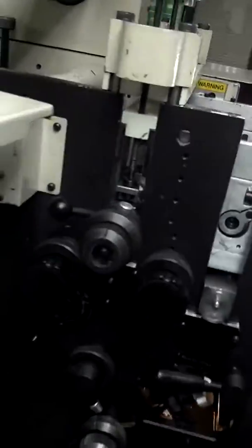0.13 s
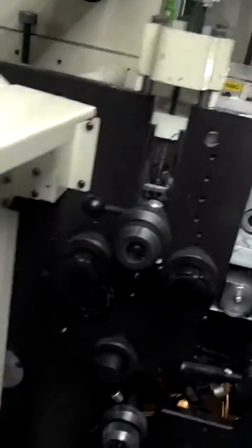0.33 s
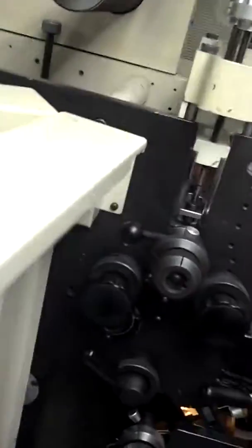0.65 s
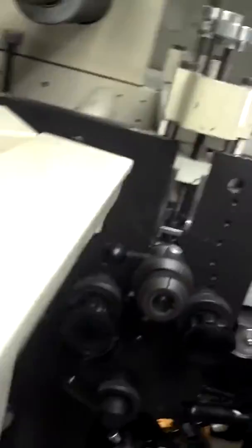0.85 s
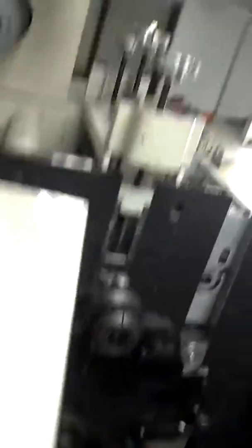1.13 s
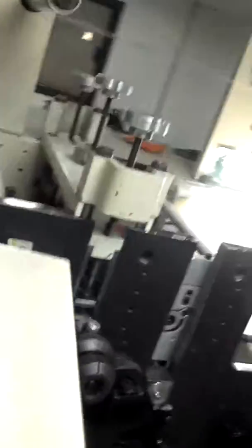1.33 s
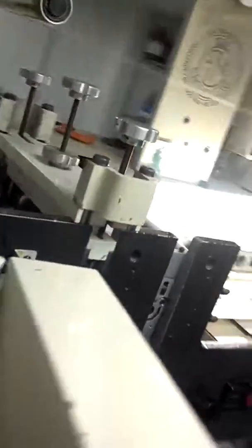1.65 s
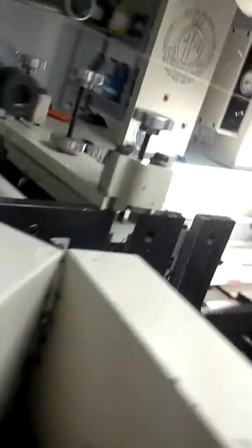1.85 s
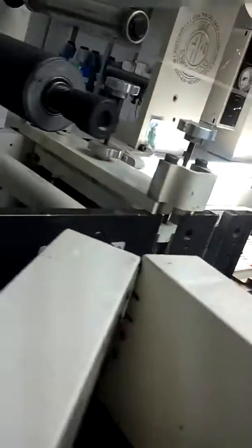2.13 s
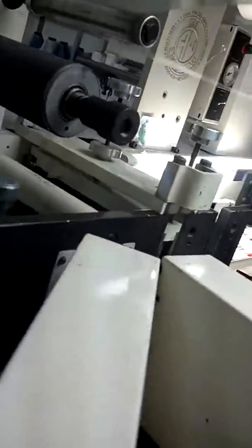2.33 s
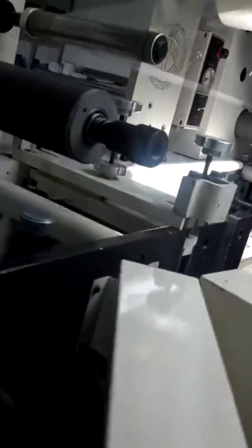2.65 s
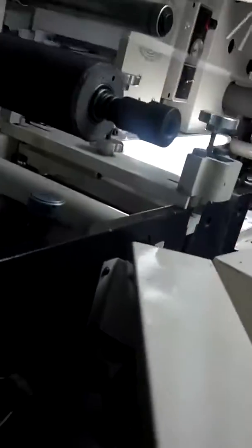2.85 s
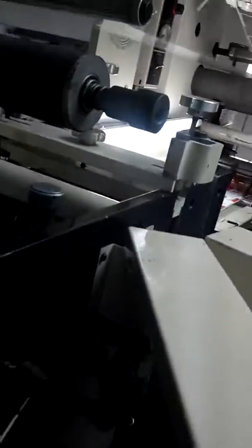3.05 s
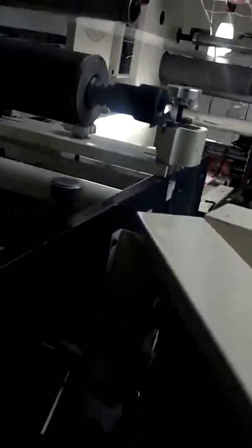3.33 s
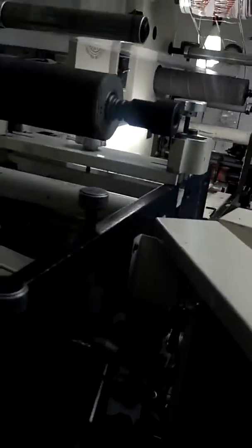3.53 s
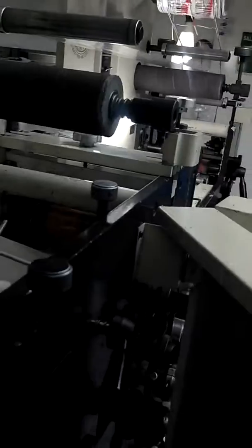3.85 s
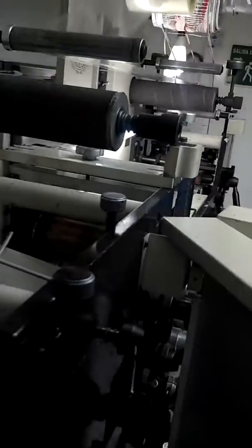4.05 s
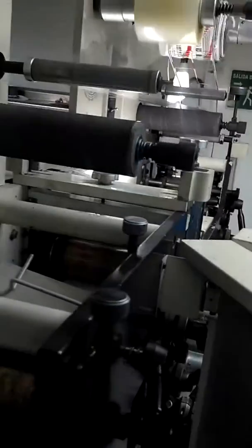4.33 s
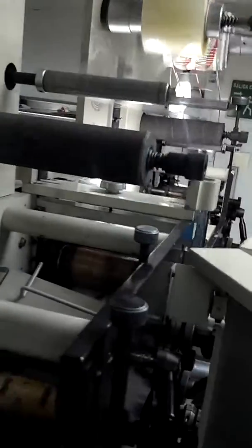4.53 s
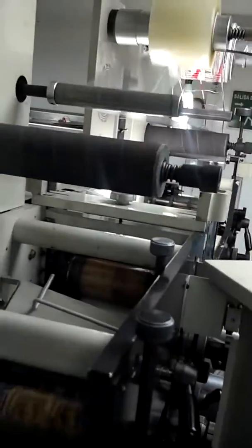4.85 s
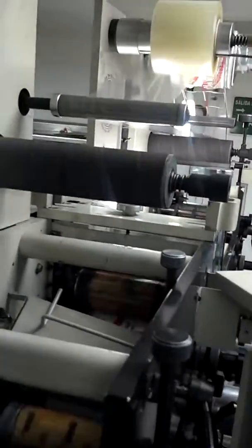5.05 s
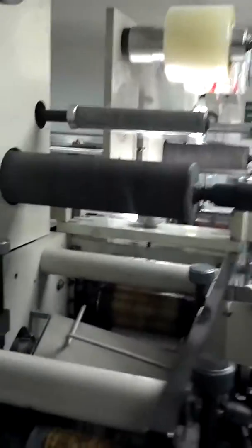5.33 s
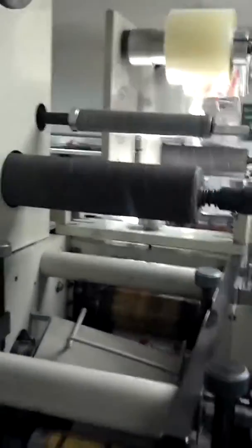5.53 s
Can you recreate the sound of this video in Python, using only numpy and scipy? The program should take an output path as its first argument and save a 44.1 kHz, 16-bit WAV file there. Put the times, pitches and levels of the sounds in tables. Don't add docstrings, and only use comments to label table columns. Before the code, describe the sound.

Close, moving pickup of a running label press: throbbing motor hum, gear whine, rumbling rollers, fluttering air hiss, sharp little ticks and hollow knocks.

```python
import sys
import numpy as np
from scipy import signal
from scipy.fft import rfft, irfft, next_fast_len
from scipy.io import wavfile
from scipy.ndimage import uniform_filter1d, map_coordinates

SR = 44100
rng = np.random.default_rng(int(sys.argv[2]) if len(sys.argv) > 2 else 0)


def gain_from_db(level_db):
    decades = np.asarray(level_db, float) / 20
    return 10 ** decades


def put_to_file(sound):
    columns = np.atleast_2d(sound).T
    safe = np.clip(columns, -1, 1)
    whole_steps = np.round(safe * 32767)
    wavfile.write(sys.argv[1], SR, whole_steps.astype(np.int16))


N = 251370
T = np.arange(N) / SR
SHAFT_HZ = 13.967
HIGH_TOOTH_TURN = 0.96


def unit(x):
    return x / np.sqrt(np.mean(x ** 2) + 1e-20)


def along(points, hz):
    f, v = np.transpose(points)
    return np.interp(np.log(hz + 1), np.log(f + 1), v)


def curves(rows):
    s, *cols = np.transpose(rows)
    return [np.interp(T, s, c) for c in cols]


def wobble(rate_hz):
    fine = np.arange(0, N / SR * rate_hz + 1, 1 / 8)
    knots = rng.standard_normal(int(N * rate_hz / SR) + 4)
    return np.interp(T * rate_hz, fine, map_coordinates(knots, [fine]))


def tooth_beat():
    return np.cos(2 * 2 * np.pi * (SHAFT_HZ * T - HIGH_TOOTH_TURN))


# frequency in Hz, ratio in dB.
APART = [(40, -24.5), (100, -16.5), (250, -13), (600, -5.5), (900, -6.5), (1100, 2), (1300, -38),
         (1500, -17), (1650, 8), (2300, -2), (3000, -3), (5000, -1), (15000, 1)]


def coloured(pair, spectrum):
    m = next_fast_len(N + 8192)
    hz = np.fft.rfftfreq(m, 1 / SR)
    gain = gain_from_db(along(spectrum, hz)) * [np.ones_like(hz), gain_from_db(along(APART, hz))]
    return irfft(rfft(pair, m) * gain, m)[:, :N]


def rush(spectrum, patchy_db, speckle_db):
    z = signal.stft(rng.standard_normal((2, N)), nperseg=512)[2]

    def field(size):
        grain = rng.standard_normal(z.shape[1:])
        return unit(uniform_filter1d(uniform_filter1d(grain, size, 0), size, 1))

    gain = gain_from_db(patchy_db * field(10) + speckle_db * field(3))
    pair = coloured(signal.istft(z * gain, nperseg=512)[1][:, :N], spectrum)
    return pair / np.std(pair[0])


def tone(hz, db, sway_db, lead=None):
    if lead is None:
        lead = 2 * np.pi * rng.random()
    turn = 2 * np.pi * hz * T + lead
    across = gain_from_db(along(APART, hz) - 12.0 + sway_db * wobble(1.63))
    level = np.sqrt(2) * gain_from_db(db + sway_db * wobble(1.636))
    return level * np.array([np.sin(turn), across * np.sin(turn + 0.315 * wobble(0.826))])


def bursts(rows, t60_s):
    t = np.arange(1024) / SR
    out = np.zeros((2, N + len(t)))
    noise = rng.standard_normal((len(rows), 2, len(t)))
    shape = gain_from_db(-60 * t / t60_s) * (1 - np.exp(-t / 0.00047))
    for (s, db), puff in zip(rows, noise):
        out[:, round(s * SR):][:, :len(t)] += gain_from_db(db) * shape * puff / np.linalg.norm(shape * puff[0])
    return out[:, :N]


# frequency in Hz, density in dB per Hz.
RUMBLE = [(25, -28.5), (40, -7), (70, -10.5), (100, 2), (170, -3.5), (250, 2), (400, -1), (680, -6),
          (950, -11.5), (1400, -20.5), (2000, -120)]
WHIRR = [(400, -120), (700, -15), (1000, -2.5), (1400, 2), (1800, -2.5), (2300, 2), (3200, 1.5),
         (4100, -4.5), (5000, -2.5), (6500, -10), (9000, -120)]


def rollers(gain_db, rumble_db, whirr_db):
    rumble_level = gain_from_db(rumble_db - 2.5 + 0.8 * wobble(28) + 0.78 * tooth_beat())
    rumble = rumble_level * rush(RUMBLE, patchy_db=0.52, speckle_db=1.5)
    whirr = gain_from_db(whirr_db - 4 + 0.54 * wobble(35)) * rush(WHIRR, patchy_db=0.8541, speckle_db=2.0)
    return gain_from_db(gain_db) * (rumble + whirr)


# frequency in Hz, density in dB per Hz.
HISS = [(3000, -120), (4500, -26.5), (6000, 0.5), (9600, 1), (11500, 2), (14000, -21.5), (18000, -120)]
SIZZLE = [(7000, -120), (9500, -33.5), (12000, -0.5), (15000, 1.5), (20000, 4)]


def air(gain_db, hiss_db):
    label_turn = 2 * np.pi * np.cumsum(46 + 3 * wobble(4.7)) / SR
    puffs = np.clip(np.sin(label_turn), 0, 1) ** 6 * abs(wobble(1.738))
    flutter_db = 2.67 * puffs + 1.093 * wobble(70) + 0.12 * wobble(5.0612)
    hiss = gain_from_db(hiss_db - 4) * rush(HISS, patchy_db=1.5, speckle_db=2.0)
    sizzle = gain_from_db(-4.5) * rush(SIZZLE, patchy_db=0.84, speckle_db=1.5)
    return gain_from_db(gain_db + flutter_db) * (hiss + sizzle)


# start in seconds, peak in dB, low part in dB relative to the peak.
TICKS = [(0.0231, -22, -21), (0.1987, -23.5, -10), (0.4918, -24, -14.5), (0.9085, -21, -11.5),
         (1.0445, -19, -17.5), (1.3021, -24.5, -6), (1.3171, -17, -10), (1.3863, -31, -9),
         (1.436, -32.5, -5), (1.4506, -17.5, -19), (1.5206, -21, -21.5), (2.0606, -17, -9),
         (2.0877, -17, -12), (2.135, -18.5, -14.5), (2.1811, -26.5, -16), (2.3077, -19, -13),
         (2.3514, -23, -23.5), (2.3737, -26.5, -15), (2.4177, -18.5, -24.5), (2.4384, -22, -8.5),
         (2.605, -20, -16.5), (2.693, -19, -7), (2.764, -21.5, -9), (2.7897, -20.5, -8.5),
         (2.827, -25, -13.5), (2.8469, -30, -17.5), (2.909, -21.5, -13.5), (2.9552, -21, -10),
         (2.9986, -22.5, -12), (3.0175, -22, -8.5), (3.2695, -24, -1), (3.3453, -20.5, -10.5),
         (3.3662, -20.5, -7.5), (3.3865, -23, -5.5), (3.482, -29, -14), (3.5272, -25.5, -11),
         (3.5742, -19.5, -14.5), (3.6203, -22, -14), (4.2112, -21.5, -2.5), (4.3332, -19, -8),
         (4.4144, -16, -11.5), (4.4443, -19.5, -16.5), (4.5014, -22.5, -18.5), (4.5281, -32, -13.5),
         (4.5486, -22, -13.5), (4.813, -20.5, -18.5), (4.8397, -21.5, -10.5), (4.8585, -20, -15.5),
         (4.9471, -26.5, 3.5), (4.99, -21, -5.5), (5.0302, -21, -1), (5.0732, -18, -11),
         (5.1432, -20.5, -9), (5.4254, -33.5, -12), (5.4846, -21, -3.5), (5.5565, -19.5, -8),
         (5.6378, -29.5, -14), (5.6595, -18.5, -14)]


def web():
    strays, stray_db, spread_db, stray_low_db = 20, -25.5, 1.5, -0.5
    snaps = list(TICKS)
    for k, (late, size) in enumerate(rng.random((strays, 2))):
        snaps.append(((k + late) * N / SR / strays, stray_db + spread_db * (2 * size - 1), stray_low_db))
    bright = bursts([(s, db + 9.5) for s, db, low in snaps], t60_s=0.016)
    dull = bursts([(s, db + low + 20.5) for s, db, low in snaps], t60_s=0.037)
    bright_spectrum = [(2500, -30.5), (5000, -10.0), (9000, 2.5), (20000, 4)]  # (Hz, dB)
    return coloured(bright, bright_spectrum) + coloured(dull, WHIRR)


# start in seconds, peak in dB, ring in Hz.
KNOCKS = [
    (2.216, -15.5, 569),
    (2.228, -10, 562),
    (2.814, -13, 570),
    (3.929, -9.5, 652),
    (4.871, -20.5, 729),
    (4.915, -11, 685),
    (4.945, -7, 669),
    (5.369, -10, 630),
    (5.509, -16, 600),
    (5.579, -14.5, 625),
]


def knocks():
    t = np.arange(2048) / SR
    blows = np.zeros((2, N + 2048))
    for s, db, hz in KNOCKS:
        ring = gain_from_db(db - 8.0 - 60 * t / 0.02295) * (1 - np.exp(-t / 0.0021)) * np.sin(2 * np.pi * hz * t)
        blows[:, round(s * SR):][:, :len(t)] -= ring * [[1], [.3]]
    return blows[:, :N]


# time in seconds, hum level in dB.
HUM = [(0, -50), (.8, -47), (1.02, -48), (1.09, -56.5), (1.2, -42), (1.32, -48.5), (1.42, -43),
       (2.1, -46.5), (2.55, -43), (3.25, -46), (3.7, -41), (3.95, -48), (4.1, -37.5), (4.3, -46.5),
       (4.5, -41), (5.2, -45.5), (5.4, -37.5), (5.7, -45)]
SLIP = [-13, -13.5, -9.5, -11.5]
THROBS = [-.2, .26, .73, 1.185, 1.565, 2.01, 2.47, 2.915, 3.39, 3.86, 4.205, 4.665, 5.115, 5.565, 5.99]


def motor():
    slip = 2 * np.pi * np.interp(T, THROBS, np.arange(len(THROBS)))
    beat = 1 - sum(gain_from_db(db) * np.exp(1j * k * slip) for k, db in enumerate(SLIP, start=1))
    hum = abs(beat) * tone(120.04, curves(HUM)[0] + 11.04, sway_db=1.73, lead=np.angle(beat))
    return hum + tone(240.1, -51, sway_db=2.5)


# time in seconds, small gear, large gear, housing rattle in dB.
GEARS = [(0.0, -47.5, -51.5, -47.5), (0.13, -46.5, -52.5, -40), (0.43, -48.5, -61.5, -52.5),
         (0.71, -53, -53, -50.5), (1.06, -46, -51, -49.5), (1.13, -66.5, -50, -50.5),
         (1.41, -45, -50, -46.5), (1.98, -43, -41.5, -55), (2.11, -70.5, -44, -51.5),
         (2.5, -41.5, -43, -31.5), (2.78, -42, -48, -40), (2.95, -40, -42.5, -29.5),
         (3.71, -36.5, -46.5, -32), (4.24, -37, -48.5, -30.5), (4.4, -43, -56.5, -34.5),
         (4.98, -40.5, -63, -33.5), (5.48, -38, -64.5, -32), (5.7, -40, -58, -28)]
TEETH = [23, 23, 24, 24, 36, 43, 43, 44, 44, 44, 45, 45, 45, 46, 46, 46, 46, 47, 47, 47, 48, 48, 49, 49, 51,
         56, 59, 59, 80, 80, 42, 44, 46, 48]
# peak in dB, its time in seconds, 6 dB down after seconds.
MESH = [(-45.5, 0.25, .5), (-43, 4.196, 0.23), (-47, 2.32, 1.14), (-47.5, 5.83, 1), (-54, 2.06, 1),
        (-51, 1.48, .5), (-43.5, 4.79, 1.17), (-53.5, 0.68, 1.85), (-47, 2.51, 0.17), (-49.5, 5.6, 0.8),
        (-48, 2.81, 1), (-49.5, 4.32, -0.07), (-53, 5.01, -0.84), (-50.5, 0.24, -0.14), (-53, 1.45, 0.49),
        (-46, 3.645, 0.63), (-43, 4.833, 0.21), (-52.5, 2.32, 0.17), (-46.5, 3.66, 0.38), (-56, 4.77, 0.85),
        (-43.5, 4.37, -0.07), (-50, 5.6, 1.37), (-56, 1.06, 0.27), (-54, 5, 0.63), (-51, 4.8, 0.62),
        (-53, 4.68, 0.41), (-54, 4, 1), (-59.5, 5, -0.02), (-53.5, 3.86, 1), (-52, 5.3, 0.04),
        (-48, 4.05, 0.2), (-46, 4.1, 0.2348), (-45.5, 4.5, 0.23), (-50, 3.95, 0.36)]
# multiple of the shaft rate, level in dB.
ORDERS = [(16, -62.5), (20, -52.5), (21, -52), (28, -59.5), (34, -53.5), (40, -80.5), (64, -64)]
# frequency in Hz, density in dB per Hz.
HOUSING = [(450, -120), (570, -12.5), (610, 8.5), (690, -6.5), (760, 0.5), (1000, -120)]


def gears():
    small_db, large_db, rattle_db = curves(GEARS)

    def locked(k):
        return -2 * np.pi * k * HIGH_TOOTH_TURN + 1.15 * (k % 2)

    pinion_db = -45.5 - 12 * np.exp(-((T - 2.7) / .8) ** 2)
    small = tone(22 * SHAFT_HZ, small_db + 5, sway_db=0.5)
    pinion = tone(18 * SHAFT_HZ, pinion_db, sway_db=1.5)
    large = tone(42 * SHAFT_HZ, large_db + 1, sway_db=0.8, lead=locked(42))
    sidebands = 0
    for k, (db, s, wide_s) in zip(TEETH, MESH):
        near_db = db - 6 * ((T - s) / wide_s) ** 2
        sidebands = sidebands + tone(k * SHAFT_HZ, near_db, sway_db=0.22, lead=locked(k))
    rattle_level = gain_from_db(rattle_db + 0.5 * tooth_beat() - 15.5)
    rattle = rattle_level * rush(HOUSING, patchy_db=2.5, speckle_db=2.5)
    rise_db = 0.46 * T
    weak = sum(tone(k * SHAFT_HZ, db - 6.0 + rise_db, sway_db=4.5) for k, db in ORDERS)
    sideways_db = 3 * np.exp(-(T / 2) ** 2)
    return (small + pinion + large + sidebands + rattle + weak) * gain_from_db([0 * T, sideways_db])


# time in seconds, noise loudness in dB, facing the air jets in dB.
NOISE = [(0, -33.5, -2.5), (.38, -33.5, -1), (.79, -36, -3), (1.2, -31, -1), (1.5, -32, -1.5),
         (1.9, -32, -0.5), (2.3, -34, -3), (2.55, -32, -0.5), (2.9, -34.5, -4), (3.1, -34, -0.5),
         (3.5, -32, -2), (3.9, -32, 0), (4.3, -32, -1.5), (4.75, -33, -0.5), (5.0, -34, -6),
         (5.2, -33.5, 1), (5.46, -32, -0.5), (5.7, -35.5, 0)]


def scene():
    loud_db, facing_db = curves(NOISE)
    rumble_db = -3 + 0.6985 * T - 0.854 * facing_db
    whirr_db = -4 + 0.6354 * T
    noise = rollers(loud_db, rumble_db, whirr_db) + air(loud_db, -5 + facing_db)
    mid, side = noise + web() + knocks() + motor() + gears()
    return np.array([mid + side, mid - side])


# snap time in seconds, rise in dB, creep in seconds.
DUCKS = [
    (0.261, 4, 0.084),
    (.93, 0.5, 0.056),
    (1.083, 3, 0.61),
    (1.42, 1.5, 0.115),
    (2.237, 2, 0.202),
    (2.698, 3.5, 0.045),
    (2.86, 1.5, 0.26),
    (4.245, 3.5, 0.243),
    (4.955, 2, 0.146),
]


def riding():
    snap_s, overshoot, recover_s = 0.00834, 0.67, 0.155
    gain_db = 0
    for s, db, creep_s in DUCKS:
        fall = (1 + np.tanh((T - s) / snap_s)) / 2
        creep = (1 - fall) * np.exp(-abs(T - s) / creep_s)
        dip = overshoot * fall * np.exp(-abs(T - s) / recover_s)
        gain_db = gain_db + db * (creep - dip)
    return gain_db


# frequency in Hz, band level over step in dB.
STEPS = [(200, 36), (800, 18), (1600, 4.5), (3000, -.5), (5200, -1), (7600, -1), (10000, 0), (13000, 2),
         (16000, 0)]
# time in seconds, lowest frequency in Hz.
REFILLS = [
    (.275, 4000),
    (2.1, 10000),
    (2.31, 9000),
    (2.37, 4000),
    (2.605, 3500),
    (2.7, 7000),
    (2.91, 4000),
    (4.82, 7500),
    (5.08, 4000),
]
# centre in seconds, half-length in seconds, centre in Hz, extra dB.
HUNGRY = [(.08, .13, 2500, 5), (.4, .16, 2600, 4), (.92, .16, 2700, 4), (1.5, .13, 2700, 5),
          (1.28, .09, 2700, 2), (2.1, .03, 2400, 7), (2.37, .05, 2600, 4.5), (2.56, .05, 2600, 5),
          (3.03, .07, 2700, 5), (3.7, 2.05, 2700, -1.5), (3.95, .35, 2700, -1.5), (1.8, .16, 2200, -3),
          (2.22, .07, 2700, -2), (.66, .08, 2200, -3), (4.48, .1, 2700, 4), (5.2, .08, 2600, 4),
          (3.2, .45, 8300, 5.5), (.75, .2, 11000, 4), (4.8, .9, 11000, 3), (.15, .2, 8300, 3),
          (.75, .17, 5500, 3), (2.85, 3, 15700, 4), (1.3, .45, 1100, 3)]


def starved(pair):
    block, grid = 1024, 925
    n, k = np.arange(2 * block), np.arange(block) + .5
    window = signal.windows.kaiser_bessel_derived(2 * block, 4 * np.pi)
    basis = np.sqrt(2 / block) * window * np.cos(np.pi / block * np.outer(k, n + .5 + block / 2))
    blocks = N // block + 3
    halves = np.pad([pair[0] + pair[1], pair[0] - pair[1]], ((0, 0), (2 * block - grid, 4 * block)))
    halves = halves[:, :(blocks + 1) * block].reshape(2, -1, block)
    z = np.concatenate([halves[:, :-1], halves[:, 1:]], axis=2) @ basis.T
    hz = k * SR / 2 / block
    t = (np.arange(blocks)[:, None] * block + grid - block) / SR

    def banded(v, size):
        return np.repeat(v.reshape(*v.shape[:-1], -1, size).mean(-1), size, axis=-1)

    power = uniform_filter1d(banded(z ** 2, size=8), size=3, axis=1)
    mood = unit(banded(uniform_filter1d(rng.standard_normal(z.shape), size=3, axis=1), size=16))
    short_db = sum(db * (abs(t - s) < span_s) * (abs(hz - near_hz) < 700) for s, span_s, near_hz, db in HUNGRY)
    mask_db = -8 + short_db + 3.6 * mood
    weak = (power < power[::-1] * gain_from_db(mask_db) ** 2) & (hz > 800)
    step = np.sqrt(banded(power.sum(0), size=32)) * gain_from_db(1.5 * mood[0] - along(STEPS, hz)) + 1e-9
    rounded = np.sign(z) * step * np.floor(abs(z / step) ** .75 + .4054) ** (4 / 3)
    sharp = sum((abs(t - s) < .014) & (hz > above_hz) for s, above_hz in REFILLS) > 0
    spill = gain_from_db(-10) * np.sqrt(power[::-1]) * rng.standard_normal(z.shape)
    back = np.where(sharp, np.where(weak, spill, z), rounded * ~weak) @ basis
    joined = back[:, 1:, :block] + back[:, :-1, block:]
    mid, side = joined.reshape(2, -1)[:, block - grid:][:, :N]
    return np.array([mid + side, mid - side]) / 2


def band_limit(x):
    return signal.sosfilt(signal.butter(12, 16860, fs=SR, output="sos"), x)


def record(dry):
    feed_lag, top_hz = 16, 15450
    late = np.pad(dry[::-1], ((0, 0), (feed_lag, 0)))[:, :N]
    wide = rfft(gain_from_db(riding()) * (dry - 1.0096 * late))
    hz = np.fft.rfftfreq(N, 1 / SR)
    band = gain_from_db(np.interp(hz, [top_hz, top_hz + 120, top_hz + 500], [0, -30, -70]))
    mix = starved(irfft(wide * band, N))
    return band_limit(mix)


dry = scene()
out = record(dry)
put_to_file(out)
```